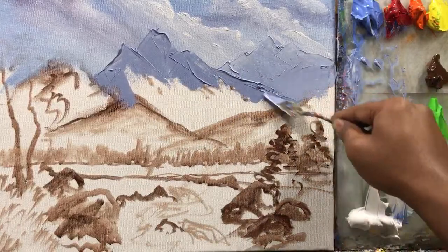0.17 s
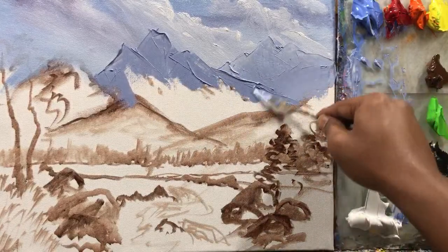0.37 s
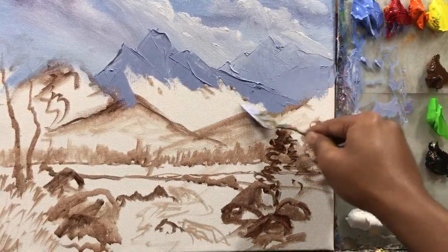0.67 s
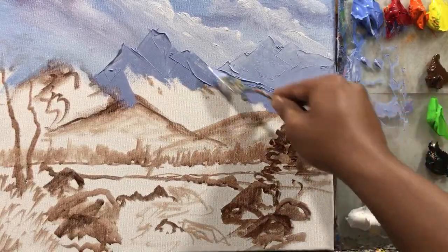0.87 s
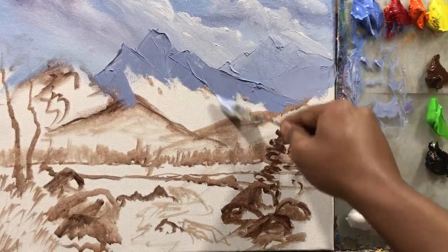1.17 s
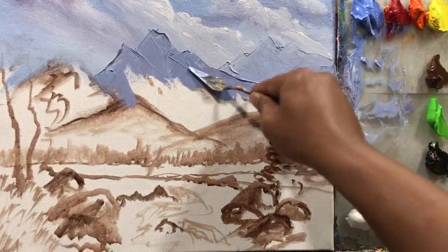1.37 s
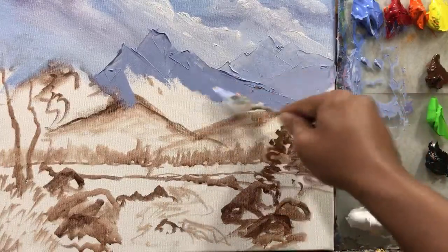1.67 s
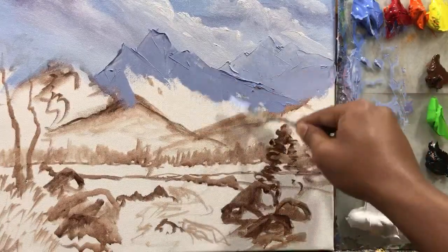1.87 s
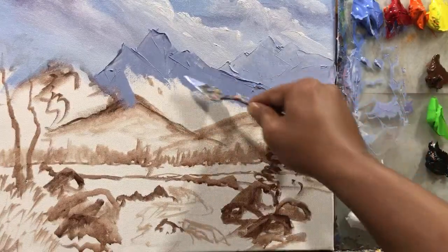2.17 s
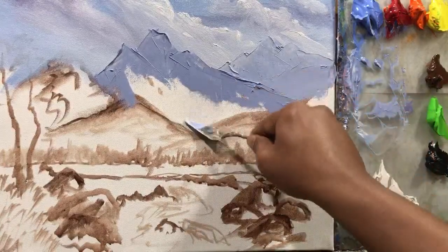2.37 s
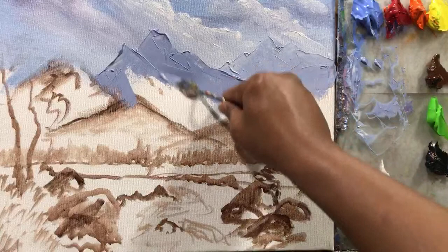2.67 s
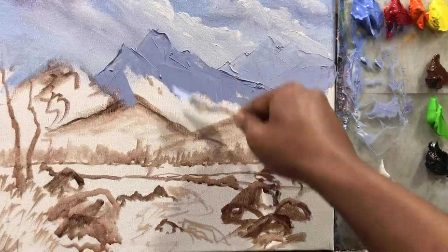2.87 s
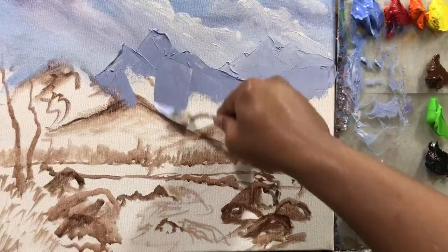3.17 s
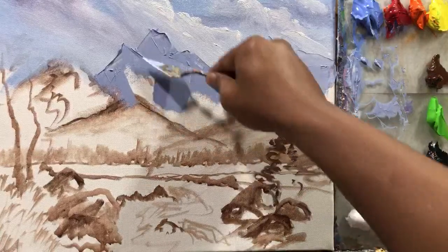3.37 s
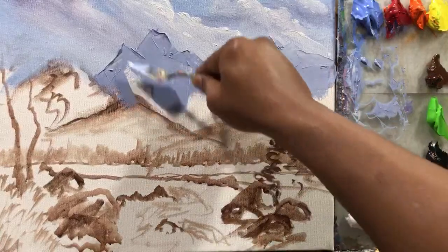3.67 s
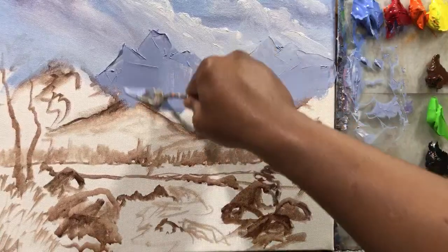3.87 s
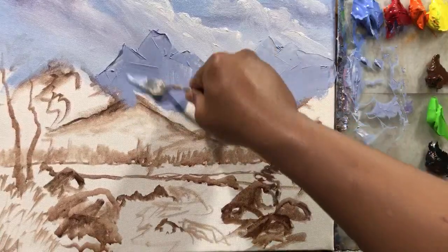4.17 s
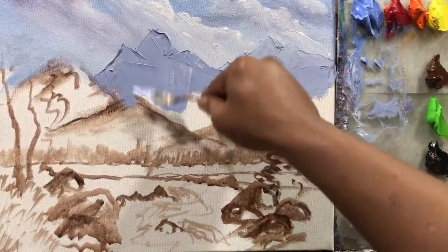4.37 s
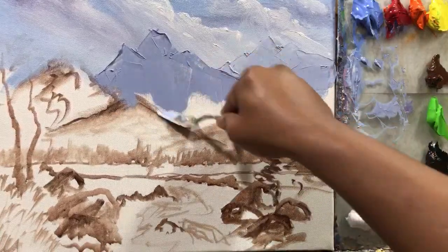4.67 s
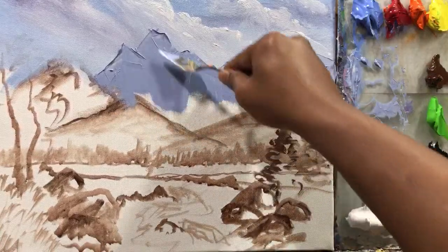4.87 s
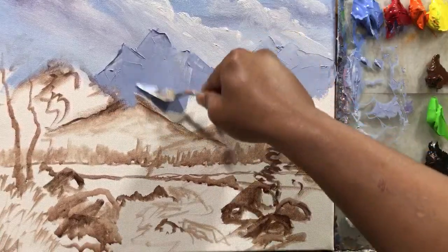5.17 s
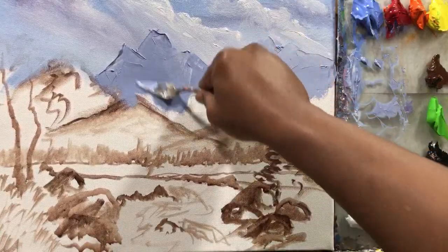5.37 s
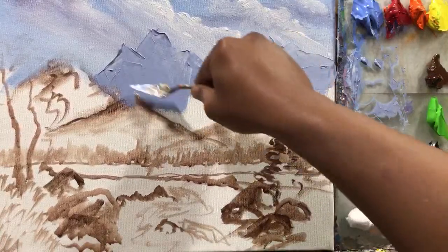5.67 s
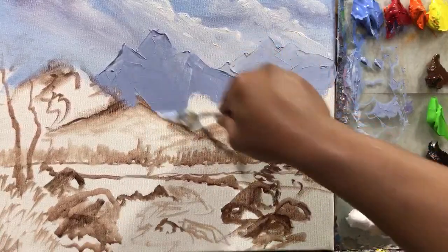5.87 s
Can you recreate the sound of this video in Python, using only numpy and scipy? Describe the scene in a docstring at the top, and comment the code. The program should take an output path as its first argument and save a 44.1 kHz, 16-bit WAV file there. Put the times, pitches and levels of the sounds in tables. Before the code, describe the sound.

Short rasping scrapes follow one another as a metal knife drags paint across a canvas, heard close up in a quiet room. The first strokes are light, then they grow fuller, each fading quickly over the hollow ring of the taut cloth. Light knocks and ticks of the blade fall among them. About two thirds through, the wooden frame gives a run of soft low thumps, followed by a few firmer taps and final scrapes.

```python
"""Palette knife on canvas

A small steel knife spreads thick paint over a stretched canvas in quick strokes, close by in a quiet
room. The blade sticks and slips in the paint and catches on the weave; the canvas rings like a slack
drum and the edge hisses. The knife taps as it lands, and the frame bumps softly on its support."""
import sys
import numpy as np
from scipy import signal
from scipy.fft import rfft, irfft
from scipy.io import wavfile
from scipy.ndimage import uniform_filter1d

SR = 44100
rng = np.random.default_rng(int(sys.argv[2]) if len(sys.argv) > 2 else 0)


def unload_wav(signal):
    """Save mono or channel-first audio to the path in sys.argv[1] as 16-bit WAV at rate SR, clipped to [-1, 1]."""
    wavfile.write(
        sys.argv[1],
        SR,
        np.round(np.clip(np.atleast_2d(signal).T, -1, 1) * 32767).astype(np.int16),
    )


N = 265173
TIME = np.arange(N) / SR
RING = np.arange(16384) / SR  # time axis of one ring-out

# Knife strokes. Where the blade presses sets the balance (upper minus lower drum modes); a steeper
# blade hisses finer (treble). Landing is the effort on contact, relative to the effort at the accent.
# start_s, accent_s, lift_s, landing_db, easing_db_per_s, drag_db, rasp_db, hiss_db, balance_db, treble_db
STROKES = [ (0.144, 0.164, 0.32, 5, 260, -58, -76, -92, -16, 0),
           (0.347, .385, 0.38, -20, 353, -54, -80, -90, -14, 0),
           (.423, 0.461, 0.49, -1.5, 282, -51.5, -52, -67.5, -2.5, 3),
           (0.627, 0.696, 1.1, -25, 278, -47.5, -47.5, -68, -8.5, 7),
           (0.968, 1.154, 1.266, -19, 271, -51.5, -56.5, -76, -4, 5),
           (1.467, 1.556, 1.73, -14.5, 182, -43, -44, -61, 0, 3.5),
           (1.75, 1.843, 2.04, -22, 249.5, -45, -46.5, -65.5, 0, 5),
           (1.988, 2.014, 2.23, -9, 203, -46.5, -49, -55.5, 7.5, 1),
           (2.279, 2.350, 2.627, -11.5, 168.5, -42.5, -44.5, -58, 3, -1),
           (2.614, 2.67, 2.69, -7, 200, -60, -79, -93, -11.5, 0),
           (2.686, 2.788, 3.007, -26, 227.5, -49, -49, -70, -2.5, 5),
           (3.1, 3.183, 3.37, -5.5, 185, -40.5, -41.5, -56, 5.5, -13),
           (3.447, 3.533, 3.673, -23, 176, -41, -40, -59, -1, -9),
           (3.799, 3.919, 4.06, -20, 275, -47, -47, -70, -2, -3.5),
           (4.098, 4.125, 4.25, 3.5, 123.5, -60.5, -66, -83, -5, -8),
           (4.16, 4.25, 4.52, -13.5, 169, -46, -44.5, -62.5, -0.5, -1),
           (4.553, 4.672, 4.83, -14, 185, -43.5, -43, -60, 4, -1),
           (4.925, 4.936, 5.02, -6, 115, -55.5, -67, -75, -5, -17),
           (5.025, 5.095, 5.384, -2, 150, -44, -45, -63.5, 2.5, -13),
           (5.323, 5.40, 5.425, -10, 60, -51, -55, -77.5, -4.5, 0),
           (5.417, 5.438, 5.61, -0.5, 104, -41, -49, -77, 0, -1.5),
           (5.586, 5.595, 6, 0.5, 248, -46, -55.5, -72, 1, -3),
           (5.777, 5.930, 6.2, -11, 202, -45, -48, -67.5, 2, 2.5), ]
# The blade knocks or snags, ringing a range of modes: start_s, level_db, low_hz, high_hz, tick_db
BLADE_TAPS = [ (.078, -57, 220, 425, -30), (.430, -43, 599, 1510, -21), (0.631, -47, 234, 450, -20),
              (.698, -40.5, 900, 1000, -38), (.968, -46.5, 280, 710, -9.5), (1.003, -45.5, 250, 344, -37),
              (1.467, -47.5, 260, 448, -33), (1.755, -45, 303, 864, -15), (1.988, -48, 300, 870, -11),
              (2.002, -37.5, 900, 1000, -30), (2.014, -39, 420, 600, -26), (2.235, -42.5, 335, 1000, -16),
              (2.297, -45, 400, 1170, -38), (2.623, -51.5, 280, 539.6, -26), (3.11, -44, 400, 1150, -30),
              (3.503, -35, 405, 1170, -32), (3.621, -45, 300, 510, -35), (3.914, -36.5, 895, 1000, -42),
              (4.553, -45, 261.5, 543, -28), (4.734, -41, 239, 360, -31), (5.021, -43, 403, 1302, -27),
              (5.194, -36.5, 240, 380, -35), (5.591, -38.5, 360, 570, -30), (5.602, -34.5, 410, 452, -34),
              (5.631, -33.5, 403, 459, -45), (5.74, -50, 331, 561.6, -25), ]
# The frame bumps on its support: start_s, level_db, pitch_hz
FRAME_BUMPS = [ (0.153, -58, 102), (.64, -56.5, 112), (1.0, -60, 100), (1.769, -50.5, 104),
               (1.8, -53.5, 71.5), (2.567, -49.5, 72.5), (2.75, -57, 77.3), (2.8, -54.5, 110),
               (2.934, -49.5, 90), (4.382, -49, 77.6), (4.433, -40.5, 94), (4.461, -48, 146),
               (4.502, -44.5, 90), (4.732, -44.5, 85), (4.781, -44.5, 84), (4.823, -44.5, 112),
               (4.862, -54, 78), (4.911, -54.5, 75), (5.03, -55, 93), (5.118, -50, 87), (5.174, -49, 78),
               (5.207, -48.5, 96), ]
# Modes of the stretched canvas: pitch_hz, width_hz, level_db
CANVAS_MODES = [(247, 40, -7), (279, 14, 1), (296, 20, 0), (325, 34, -3), (361, 12, 2), (398, 12, -8),
                (427, 12, 0), (463, 14, 3), (486, 16, -6), (507, 14, -2), (548, 14, -4), (581, 12, -5),
                (621, 16, -7), (666, 30, -8), (717, 40, -11), (811, 34, -10), (843, 12, -6), (903, 24, -4),
                (959, 20, 0), (1003, 26, -4), (1050, 32, -11), (1098, 40, -10), (1184, 24, -10),
                (1238, 22, -10), (1339, 30, -14), (1390, 26, -14), (1444, 40, -17), (1533, 40, -16)]
# Tone of the cloth right under the blade: frequency_hz, level_db
CLOTH_TONE = [(40, -80), (150, -30.5), (280, -4.5), (480, -7), (750, -0.5), (960, 0.5), (1250, 4.5),
              (1700, -5.5), (2500, -15.5), (5000, -32.5)]
# Tone of the crunching paint: frequency_hz, level_db
CRUNCH_TONE = [(700, -32), (1250, -2.5), (1600, 5.5), (2100, 4), (2600, -3), (3300, -5), (4500, -14),
               (8000, -28)]
# Tone of the hissing steel edge: frequency_hz, level_db
EDGE_TONE = [(1500, -8.5), (2700, -2.5), (3700, 1), (5000, -1.5), (6000, 0), (7400, -4.5), (8600, -2),
             (9500, -5), (10300, -16.5), (12000, -9.5), (15500, -36)]
# Tone of the room's still air: frequency_hz, level_db
AIR_TONE = [(20, -48.5), (33, -27.5), (55, 0), (80, -0.5), (150, 0), (200, -3.5), (320, 1.5), (600, -10),
            (1000, -10.5), (2000, -16.5), (4000, -22), (8000, -27.5), (15500, -31.5)]


def knife_scrape(weave_db=-1, top_db=-7, slap_db=-8, crunch_db=-2, edge_share=0.59):
    """Slow slips in the paint push the drum modes; faster catches on the threads ring the bright ones."""
    lower_modes = canvas_ring(0, 410, damp_hz=3)
    upper_modes = canvas_ring(410, 640, damp_hz=3)
    # wet paint damps the higher modes most
    bright_modes = canvas_ring(640, 1080, damp_hz=16)
    top_modes = canvas_ring(1080, SR, damp_hz=16)
    drag, rasp, hiss, balance, treble = stroke_envelopes()
    speed = np.sqrt(rasp / rasp.max())
    grip = undb(wander(rate_hz=70))  # lumps of paint make the grip come and go
    slips = catches(500 + 1200 * speed, scatter_db=0.5) * grip
    threads = catches(800 + 3000 * speed, scatter_db=3.5) * grip
    grit = catches(1600 + 5500 * speed, scatter_db=2.5) * grip
    push = slips * drag / np.sqrt(1 + balance ** 2)
    drum = ring(push, lower_modes) + ring(push * balance, upper_modes)
    weave = ring(threads * rasp, bright_modes)
    # only a fast blade reaches the highest modes
    weave += undb(top_db) * ring(grit * rasp * np.sqrt(speed), top_modes)
    # the cloth under the blade also speaks at once, without ringing
    slap = ring(catches(4000, scatter_db=2) * rasp, colour(CLOTH_TONE))
    # paint crunches where the edge bites and the blade moves fast
    bite = rasp ** (1 - edge_share) * hiss ** edge_share
    grains = catches(1500 + 3000 * speed, scatter_db=2.5) * grip
    crunch = ring(grains * bite, colour(CRUNCH_TONE))
    edge = ring(grit * hiss, colour(EDGE_TONE))
    edge += (treble - 1) * butter(edge, 8100, "high", order=1)
    return drum + undb(weave_db) * weave + undb(slap_db) * slap + undb(crunch_db) * crunch + edge


def stroke_envelopes(contact_s=0.016, drag_lead_s=0.011):
    """The hand's effort ramps in dB; drag, rasp and hiss follow as powers of it until the knife lifts."""
    drag, rasp, hiss = np.zeros((3, N))
    balance, treble = np.ones((2, N))
    for start_s, accent_s, lift_s, landing_db, easing, *levels in STROKES:
        drag_db, rasp_db, hiss_db, balance_db, treble_db = levels
        contact = np.clip(np.minimum(TIME - start_s, lift_s - TIME) / contact_s + 0.5, 0, 1)
        on = contact > 0
        attack_s = max(accent_s - start_s, contact_s)
        # the low drum tone takes a moment to swell, so its push comes slightly early
        for layer, level_db, knee_s, attack_power, release_power in [
                (drag, drag_db, accent_s - drag_lead_s, 0.56, 0.76),
                (rasp, rasp_db, accent_s, 1.02, 1.13),
                (hiss, hiss_db, accent_s, 1.54, 0.79)]:
            attack_db = attack_power * landing_db * np.clip((knee_s - TIME[on]) / attack_s, 0, 1)
            release_db = -release_power * easing * np.maximum(TIME[on] - knee_s, 0)
            layer[on] += contact[on] * undb(level_db + attack_db + release_db)
        balance[on], treble[on] = undb(balance_db), undb(treble_db)
    return drag, rasp, hiss, balance, treble


def catches(rate_hz, scatter_db):
    """The blade sticks and lets go in tiny random clicks of uneven size, with a mean power of 1."""
    chance = np.clip(rate_hz / SR, 0, 1)
    hit = rng.random(N) < chance
    size = undb(scatter_db * np.clip(rng.standard_normal(N), -2, 2)) * rng.choice([-1, 1], N)
    return hit * size / size.std() / np.sqrt(chance)


def canvas_ring(low_hz, high_hz, polarity=-1, damp_hz=0):
    """A range of canvas modes rings after a push; neighbours swing opposed (-1) or together (1)."""
    modes = 0
    for k, (pitch_hz, width_hz, level_db) in enumerate(CANVAS_MODES):
        if low_hz <= pitch_hz < high_hz:
            decay = np.exp(-np.pi * (width_hz + damp_hz) * RING)
            gain = polarity ** k * undb(level_db) * width_hz
            modes += gain * decay * np.cos(2 * np.pi * pitch_hz * RING)
    return unit(butter(modes, 200, "high", order=4))


def blade_taps(tick_s=0.0034, damp_s=0.27, ping_hz=4600, ping_s=0.0054, ping_db=-13):
    """The landing blade kicks canvas modes together and damps them as it stays; bare steel ticks."""
    out = np.zeros(N)
    steel = unit(colour(EDGE_TONE) + colour(CRUNCH_TONE) / 2)
    # the thin blade pings briefly before the paint stops it
    ping = undb(ping_db) * np.exp(-RING / ping_s) * np.sin(2 * np.pi * ping_hz * RING)
    for start_s, level_db, low_hz, high_hz, tick_db in BLADE_TAPS:
        body = canvas_ring(low_hz - 30, high_hz + 30, polarity=1)
        knock = band(body * np.exp(-RING / damp_s), low_hz / 2, high_hz * 2, order=2)
        knock /= np.abs(knock).max()
        burst = rng.standard_normal(len(RING)) * np.exp(-RING / tick_s)
        tick = ring(burst, steel)[:len(RING)]
        add(out, start_s, undb(level_db) * (knock + undb(tick_db) * (tick / 2 + ping)))
    return out


def frame_bumps(rise_s=0.0053, twist_ratio=1.66, twist_db=-12, rock_hz=62, rock_db=-7,
                settle_s=0.021, settle_db=-7):
    """The wooden frame rocks, flexes and twists for a cycle or two, then shudders to rest."""
    out = np.zeros(N)
    swell = (RING / (2 * rise_s)) ** 2 * np.exp(2 - RING / rise_s)
    rock = undb(rock_db) * np.sin(2 * np.pi * rock_hz * RING)
    for start_s, level_db, pitch_hz in FRAME_BUMPS:
        phase = 2 * np.pi * pitch_hz * RING
        motion = rock + np.sin(phase) + undb(twist_db) * np.sin(twist_ratio * phase)
        shudder = band(rng.standard_normal(len(RING)), 65, 172, order=4)
        settle = undb(settle_db) * shudder / shudder.std() * np.exp(-RING / settle_s)
        add(out, start_s - rise_s / 2, undb(level_db) * (swell * motion + settle))
    return butter(out, 46, "high", order=5)


def frame_tremble(low_hz=60, high_hz=160, gain_db=-24):
    """The whole frame trembles faintly under the dragging hand."""
    drag = stroke_envelopes()[0]
    tremble = band(rng.standard_normal(N), low_hz, high_hz, order=5)
    return undb(gain_db) * np.sqrt(drag * drag.mean()) * tremble / tremble.std()


def room_reverb(sound, t60_s=0.5, wet_db=-13.5, predelay_s=0.00567, high_cut_hz=7000):
    """The walls of a small room add a short, slightly dull tail."""
    decay = undb(-60 * RING / t60_s) * (RING > predelay_s)
    tail = butter(rng.standard_normal(len(RING)) * decay, high_cut_hz, "low", order=1)
    return sound + undb(wet_db) * ring(sound, unit(tail))


def room_air(level_db=-67.5, waver_db=4.5):
    """A bed of steady room hiss over a rumble that wavers a little."""
    noise = ring(rng.standard_normal(N), colour(AIR_TONE))
    rumble = butter(noise, 620, "low", order=1)
    waver = undb(waver_db * wander(rate_hz=6))
    return undb(level_db) * (noise + (waver - 1) * rumble)


def colour(points):
    """Minimum-phase response of unit energy, shaped to an EQ curve of (Hz, dB) points."""
    hz, db = np.transpose(points)
    half = len(RING) // 2
    bins_hz = np.arange(half + 1) * SR / len(RING)
    curve_db = np.interp(np.log(bins_hz + 1), np.log(hz), db)
    cepstrum = irfft(np.log(undb(curve_db)))
    cepstrum[1:half] *= 2
    cepstrum[half + 1:] = 0
    return unit(irfft(np.exp(rfft(cepstrum))))


def wander(rate_hz):
    """Smooth random modulation with a spread of 1."""
    hold = int(SR / rate_hz)
    steps = np.repeat(rng.standard_normal(N // hold + 1), hold)[:N]
    smooth = uniform_filter1d(steps, hold)
    return smooth / smooth.std()


def undb(db):
    """Decibels to gain."""
    return 10 ** (np.asarray(db) / 20)


def unit(response):
    """Scale a response so that it keeps the level of white noise."""
    return response / np.sqrt(np.sum(response ** 2))


def ring(push, response):
    """Play a signal through a response."""
    return signal.fftconvolve(push, response)[:N]


def butter(x, hz, kind, order):
    """Low-pass or high-pass."""
    return signal.sosfilt(signal.butter(order, hz, kind, fs=SR, output="sos"), x)


def band(x, low_hz, high_hz, order):
    """Band-pass."""
    return butter(butter(x, low_hz, "high", order), high_hz, "low", order)


def add(out, start_s, sound):
    """Mix a sound in at its cue."""
    start = max(int(start_s * SR), 0)
    out[start:start + len(sound)] += sound[:N - start]


def scene():
    """Mono mix: the knife up front with a touch of room, the frame and the air underneath."""
    knife = room_reverb(knife_scrape() + blade_taps())
    return (knife + frame_bumps() + frame_tremble() + room_air())[None]


def record(dry, high_cut_hz=15700):
    """A steep high cut takes off the very top."""
    return signal.sosfilt(signal.ellip(10, 0.2, 70, high_cut_hz, fs=SR, output="sos"), dry)


dry = scene()
out = record(dry)
unload_wav(out)
```